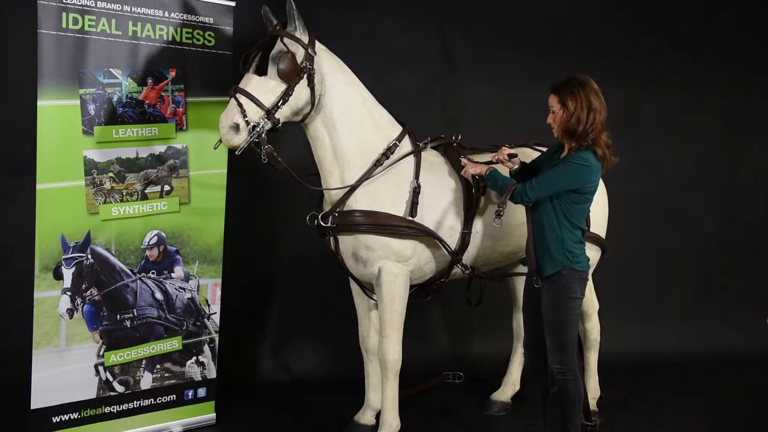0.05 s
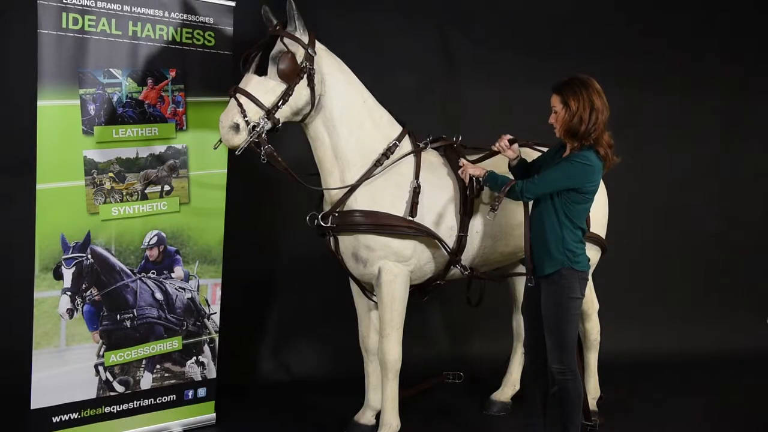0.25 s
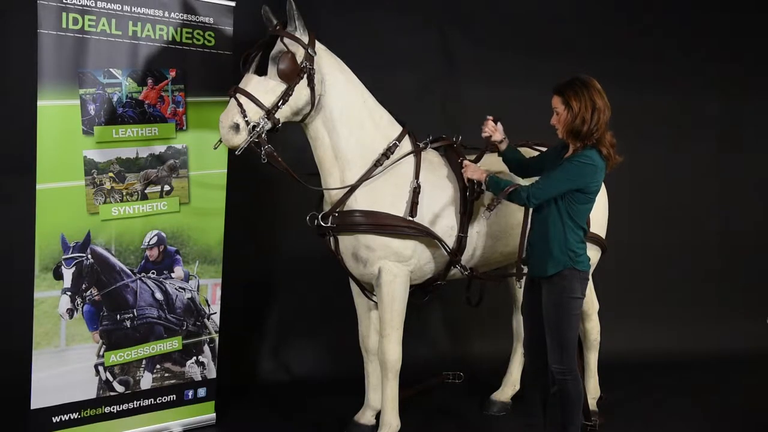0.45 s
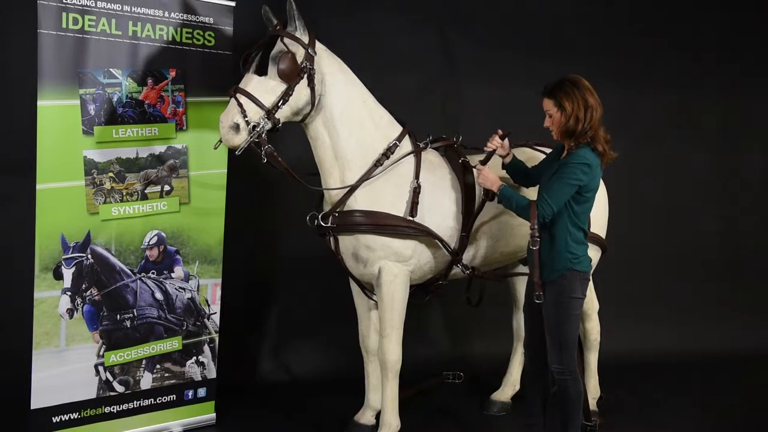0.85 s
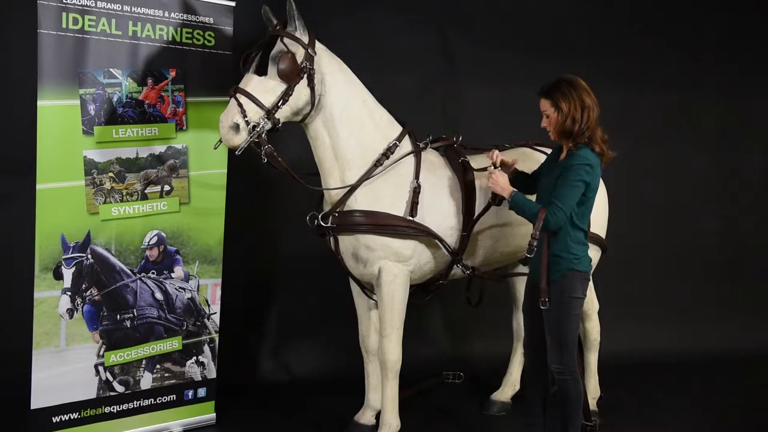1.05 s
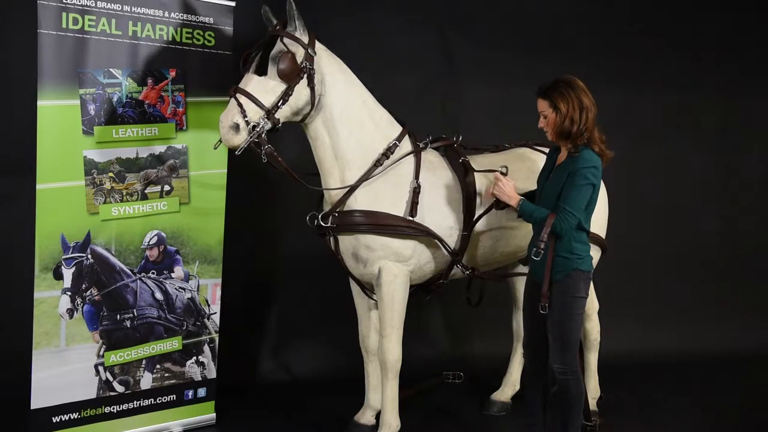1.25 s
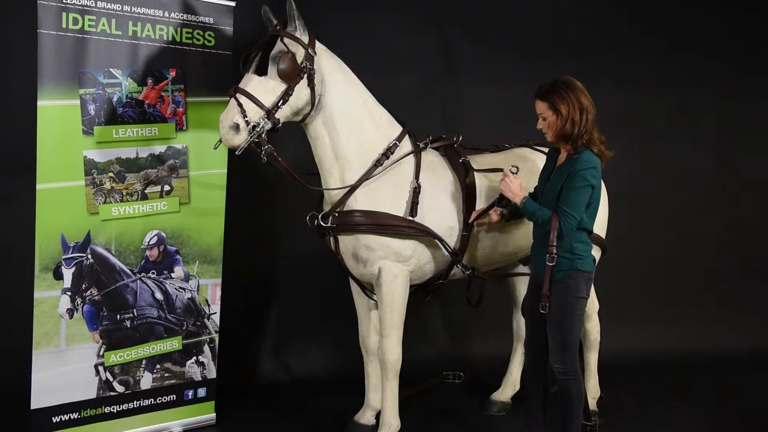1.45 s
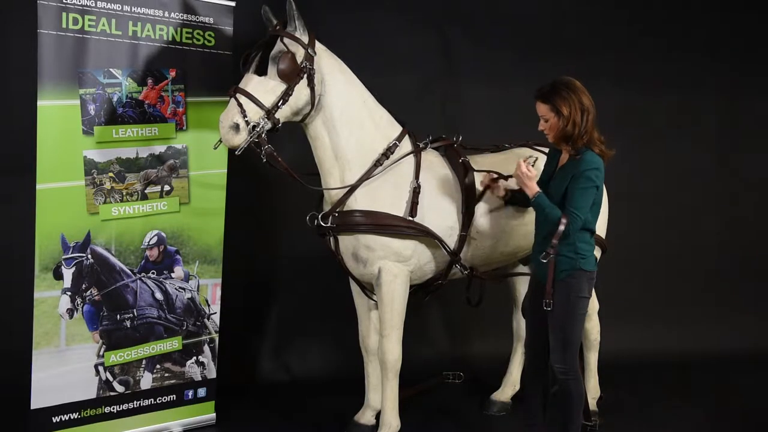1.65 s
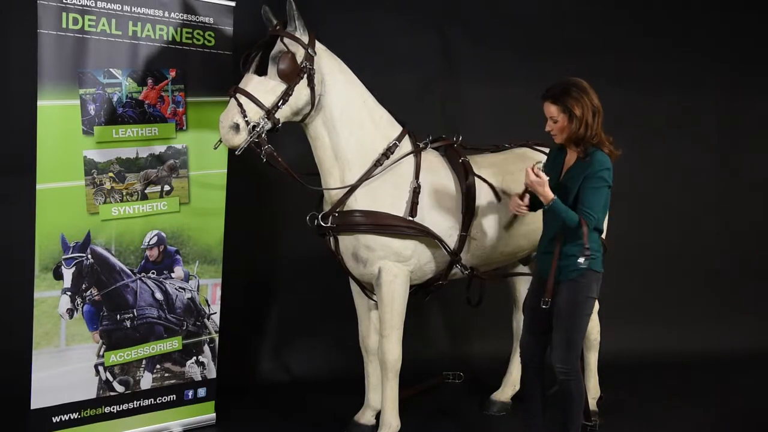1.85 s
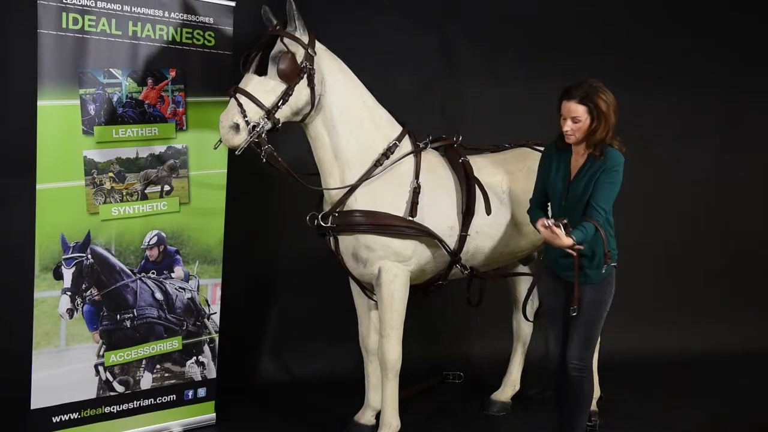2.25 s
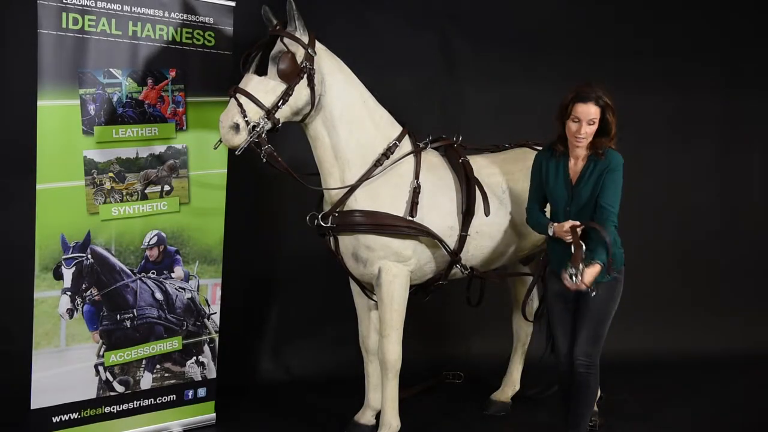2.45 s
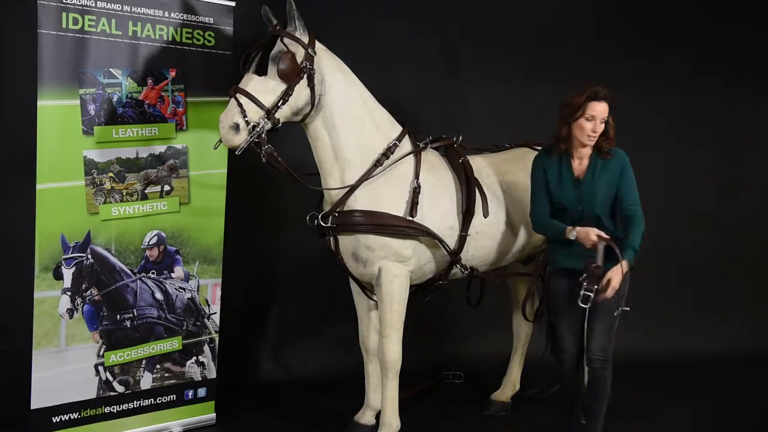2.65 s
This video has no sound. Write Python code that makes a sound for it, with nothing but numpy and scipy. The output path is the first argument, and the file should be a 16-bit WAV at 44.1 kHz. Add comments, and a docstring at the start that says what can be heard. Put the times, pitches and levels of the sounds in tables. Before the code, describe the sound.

Metal buckles clink as leather harness straps are unfastened, sliding and slapping softly.

```python
"""A heavy buckle drops against a hollow model horse as its leather harness is unfastened.
A smaller buckle and a ring clink in the hand; each metal contact cracks, then rings in its modes.
Straps slap the body, which resonates under them, and slide in tiny stick-slip grains.
A small studio rings briefly after every contact; under it lie a soft hiss and a thin electrical whine."""
import sys
import numpy as np
from scipy import signal
from scipy.fft import rfft, irfft
from scipy.io import wavfile
from scipy.ndimage import uniform_filter1d

SR = 44100
rng = np.random.default_rng(int(sys.argv[2]) if len(sys.argv) > 2 else 0)


def unload_wav(signal):
    """Save mono or channel-first audio to the path in sys.argv[1] as 16-bit WAV at rate SR, clipped to [-1, 1]."""
    wavfile.write(
        sys.argv[1],
        SR,
        np.round(np.clip(np.atleast_2d(signal).T, -1, 1) * 32767).astype(np.int16),
    )


N = 119070
TAIL = 32768   # samples for one contact and its decay
TIME, TAIL_S = np.arange(N) / SR, np.arange(TAIL) / SR
HZ = np.maximum(np.fft.rfftfreq(N, 1 / SR), 1)
TAIL_HZ = np.maximum(np.fft.rfftfreq(TAIL, 1 / SR), 1)


def heavy_buckle():
    """The heavy buckle lands on the body in one quick clatter."""
    # contacts: start_s, ring_db, crack_db, tilt_db_per_octave, pan_db, strike_spot
    hits = [(.2065, -40, -42.5, -4, -2.5, 0.9), (.229, -31.5, -28.5, -5, -2.5, 1),
            (.2325, -26, -43, -2, -3, 1), (.2478, -26, -22.5, 0, 0, 0), (.253, -35.5, -25.5, -0.5, 2, 0),
            (.265, -36, -55, -4, 1, 0.45), (.324, -55, -53, -4, 5, .5)]
    # buckle modes: pitch_hz, level_db, free_t60_s, boost_db_at_spot_1
    modes = [(3140, -8, .12, 0), (3268, -10, .26, -2), (4640, -13, .17, -2), (4740, -13, .08, 0),
             (5636, -17, .22, 0), (6795, -6, .18, 0), (7250, -8, .08, 2), (7610, -7, .1, 5),
             (7745, -3, .22, 7), (7850, -7, .12, 5), (8935, -7, .14, -3), (9400, -5, .15, -6),
             (9634, 0, .17, -9), (9825, -5, .18, -6), (11470, -12, .1, -4), (13030, -14, .1, -4)]
    return struck_metal(hits, modes, low_cut_hz=540)


def small_buckle():
    """The smaller buckle clinks in the hand, with less bass in its crack."""
    # contacts: start_s, ring_db, crack_db, tilt_db_per_octave, pan_db, strike_spot
    hits = [(.503, -55.5, -50.5, -3.5, -1, 0.53), (.729, -68, -55, -6, -4, -0.28),
            (1.912, -59, -61, 0, 1, 0.37), (1.997, -47.5, -52, -17, -1.5, 0),
            (2.0085, -39, -44.5, 3, -3.5, 0.079), (2.04, -43, -49, -0.5, -1, 0.73),
            (2.056, -37.5, -44, -0.5, 0, 1), (2.095, -54.5, -52, -3.5, -6, 0.39),
            (2.376, -43, -45.5, -4, -6.5, 0.34), (2.384, -46, -49.5, 3, 3, -0.0026),
            (2.396, -37.5, -44, -5, 0.5, -1.5), (2.400, -41, -40.5, -3.5, 3, -1.2),
            (2.412, -51.5, -40, -3.5, 1, -1.1), (2.636, -52, -53.5, -8, -6, 0.1),
            (2.655, -37.5, -44, 6.5, -0.5, 0.99)]
    # buckle modes: pitch_hz, level_db, free_t60_s, boost_db_at_spot_1
    modes = [(3270, -10, .3, -3), (4645, -13, .3, 5), (5655, -12, .27, 11), (6790, -9, .25, -6),
             (6865, -6, .38, -7), (7125, -9, .2, -1), (7712, -3, .25, -6), (7790, 0, .3, -3),
             (9500, -3, .18, -1), (11520, -16, .2, -5), (11970, -10, .23, 12), (12900, -15, .25, 3),
             (14060, -22, .15, 0), (14750, -21, .12, -3)]
    return struck_metal(hits, modes, low_cut_hz=990)


def harness_ring():
    """The ring, smallest of the fittings, chinks with the thinnest crack."""
    # contacts: start_s, ring_db, crack_db, tilt_db_per_octave, pan_db, strike_spot
    hits = [(1.3635, -37, -72, 0.01, -0.39, 1), (1.3665, -32, -39, 0.0038, -0.4, 0.15),
            (1.373, -42, -49, 0, -0.026, 1), (1.383, -32.5, -42, 0.016, 0.17, 0),
            (2.294, -43, -52.5, 0, 2, 0.54)]
    # ring modes: pitch_hz, level_db, free_t60_s, boost_db_at_spot_1
    modes = [(3530, -21, .07, 2), (5114, -17, .12, 0), (6810, -18, .15, 0), (7757, -12, .15, 0),
             (8080, -4, .14, 2), (8185, -2, .3, 0), (8248, 0, .25, 0), (8540, -13, .18, 0),
             (9715, -16, .1, 2), (10860, -11, .2, 3), (10960, -11, .12, 3)]
    return struck_metal(hits, modes, low_cut_hz=6000)


def struck_metal(hits, modes, low_cut_hz, crack_s=0.0022, scatter_db=1.5):
    """Each contact cracks and sets the modes ringing; the spot struck shifts their balance."""
    # spectrum of metal cracking on metal: frequency_hz, level_db
    crack_eq = [(300, -29), (1500, -12.5), (2500, -13.5), (3400, -3.5), (4200, -6.5), (5500, -5.5),
                (7200, 2.5), (9500, 3), (11000, -3.5), (13000, -3.5), (14700, -21), (16000, -25)]
    crack_filter = causal(colour(crack_eq, TAIL_HZ) / np.hypot(1, (low_cut_hz / TAIL_HZ) ** 3))
    out, tones = np.zeros((2, N)), damped_tones(modes)
    hz, mode_db, _, spot_db = np.transpose(modes)
    for start_s, ring_db, crack_db, tilt_db, pan_db, spot in hits:
        path = room()
        scatter = scatter_db * rng.standard_normal(len(hz))
        gains = from_db(mode_db + spot * spot_db + tilt_db * np.log2(hz) + scatter)
        ringing = unit(sum(gain * unit(tone * path) for gain, tone in zip(gains, tones)))
        tilt = from_db(tilt_db * np.log2(np.maximum(TAIL_HZ, hz.min())))
        crack = unit(burst(crack_s) * crack_filter * tilt * path)
        pan = from_db([[pan_db / 2], [-pan_db / 2]])   # positive leans left
        add(out, start_s, (from_db(ring_db) * ringing + from_db(crack_db) * crack) * pan)
    return out


def strap_slaps(body_db=-7, treble_floor_db=-24):
    """Soft blows of leather, with the hollow body sounding under them."""
    # blows: start_s, level_db, decay_s, low_cut_hz, high_cut_hz
    slaps = [(.187, -50, 0.0047, 500, 3600), (0.199, -45.5, 0.011, 80, 2500),
             (.2235, -31.5, 0.0027, 106, 2270), (0.242, -35.5, 0.0048, 71.4, 470),
             (0.255, -40, .004, 67, 310), (.755, -51, 0.037, 89, 352), (0.733, -56, 0.0032, 151, 2300),
             (.908, -59, 0.0027, 246, 590), (1.425, -50, 0.017, 121, 1060),
             (1.534, -34.5, 0.0071, 132, 1420), (1.543, -33, 0.023, 140, 1800),
             (1.655, -48, 0.025, 89.5, 1540), (1.74, -57, 0.0058, 78, 1570),
             (1.995, -55, 0.0064, 157, 1210), (2.53, -53.5, 0.0069, 172, 860),
             (2.589, -52, 0.00087, 173, 464), (2.609, -74, 0.005, 168, 450)]
    # spectrum of a leather slap: frequency_hz, level_db
    slap_eq = [(60, 2.5), (160, -2), (300, -1.5), (550, -5.5), (850, -6.5), (1300, -13.5), (2000, -9),
               (4000, -10.5), (12000, -28)]
    # hollow body modes: pitch_hz, level_db, free_t60_s
    modes = [(119.9, 1.5, 0.16), (159.2, -9.5, 0.15), (226, -5.5, 0.15), (275.3, -1, 0.12), (339, -10, 0.1),
             (464, -11.5, 0.067), (779, -15.5, 0.072), (1071, 2, 0.16), (1384, 8.5, 0.09)]
    out, tones = np.zeros((2, N)), damped_tones(modes)
    gains = from_db([db for _, db, _ in modes])
    for start_s, level_db, decay_s, low_cut_hz, high_cut_hz in slaps:
        path = room()
        high_cut = 1 / np.hypot(1, (TAIL_HZ / high_cut_hz) ** 4) + from_db(treble_floor_db)
        band = causal(high_cut / np.hypot(1, (low_cut_hz / TAIL_HZ) ** 4))
        smack = unit(burst(decay_s) * causal(colour(slap_eq, TAIL_HZ)) * path * band)
        body = sum(gain * rng.choice([-1, 1]) * unit(tone * path) for gain, tone in zip(gains, tones))
        add(out, start_s, from_db(level_db) * (smack + from_db(body_db) * unit(band * body)))
    return out


def strap_slides(grains_per_s=1500, grain_spread_db=2.5):
    """Leather sticks and slips in tiny grains under a stroke that swells and fades."""
    # strokes: peak_s, half_length_s, level_db, tilt_db_per_octave
    strokes = [(.05, 0.19, -57, 1), (0.487, 0.028, -57.5, 0.5), (0.568, 0.042, -54.5, 1.5),
               (0.687, 0.023, -52.5, 1), (.76, .045, -49.5, 0), (0.852, 0.083, -57, -1),
               (1.022, 0.047, -51.5, 2.5), (1.087, 0.037, -58.5, -1), (1.179, 0.049, -48.5, 1),
               (1.265, 0.06, -73, -3), (1.564, 0.029, -44, 5.5), (1.678, .04, -52.5, 4),
               (2.019, 0.046, -50.5, 4), (2.219, 0.028, -54, 7), (2.299, 0.016, -54.5, 1.5),
               (2.341, 0.04, -48, 3.5), (2.418, 0.043, -53.5, 3), (2.59, 0.036, -47.5, 4),
               (2.662, 0.058, -47.5, 9)]
    # spectrum of rubbing leather: frequency_hz, level_db
    leather_eq = [(60, -7.5), (130, 1), (300, 1.5), (700, -3), (1800, -6), (3500, -14), (8000, -18),
                  (12000, -22.5), (16000, -55)]
    out = np.zeros((2, N))
    for peak_s, half_s, level_db, tilt_db in strokes:
        slips = (rng.random(TAIL) < grains_per_s / SR) * rng.choice([-1, 1], TAIL)
        grains = slips * from_db(grain_spread_db * np.minimum(rng.exponential(1, TAIL), 4))
        swell = np.sin(np.pi / 2 * np.minimum(TAIL_S / half_s, 2))
        timbre = causal(colour(leather_eq, TAIL_HZ) * from_db(tilt_db * np.log2(TAIL_HZ / 1000)))
        add(out, peak_s - half_s, from_db(level_db) * unit(rfft(grains * swell) * timbre * room()))
    return out


def room(low_t60_s=0.4, high_t60_s=0.25, crossover_hz=9000, build_up_s=0.0004, direct_db=-7):
    """Spectrum of the direct sound and dense echoes from one spot; the treble dies sooner."""
    noise = rng.standard_normal((2, TAIL)) * (1 - np.exp(-TAIL_S / build_up_s))
    lowpass = 1 / (1 + 1j * TAIL_HZ / crossover_hz)
    lows = lowpass * rfft(noise * from_db(-60 * TAIL_S / low_t60_s))
    highs = (1 - lowpass) * rfft(noise * from_db(-60 * TAIL_S / high_t60_s))
    direct = from_db(direct_db) * unit(np.ones(1))
    return direct + unit(spread(*(lows + highs), TAIL_HZ))


def room_hiss(level_db=-58.5):
    """A soft, steady bed of diffuse noise."""
    # spectrum of the room tone: frequency_hz, level_db
    hiss_eq = [(25, -15), (55, -6), (110, -3), (250, -5.5), (500, -12.5), (1000, -13.5), (2500, -15.5),
               (5500, -17.5), (8500, -14), (10400, -21.5), (13000, -25), (16000, -38)]
    mid, side = rfft(rng.standard_normal((2, N)))
    hiss = irfft(spread(mid, side, HZ) * colour(hiss_eq, HZ), N)
    return from_db(level_db) * hiss / hiss.std()


def electrical_whine(pitch_hz=10588.5, first_pulse_s=0.085, period_s=0.1, right_db=-21.5):
    """On the left, a steady whine, a buzz that switches on and off, and a faint fizz."""
    whine = from_db(-61.5) * np.sqrt(2) * np.sin(2 * np.pi * pitch_hz * TIME)
    switched_on = np.cos(2 * np.pi * (TIME - first_pulse_s) / period_s) > 0
    gate = uniform_filter1d(switched_on.astype(float), size=200)
    buzz = from_db(-55.5) * gate * narrow_noise(hz=10110, width_hz=55)
    fizz = from_db(-61.5) * narrow_noise(hz=9670, width_hz=620)
    return (whine + buzz + fizz) * from_db([[0], [right_db]])


def damped_tones(modes, grip_db_per_s=68):
    """The spectrum of one dying sine per mode; hand and leather shorten its free decay."""
    grip = from_db(-grip_db_per_s * TAIL_S)
    return [rfft(np.sin(2 * np.pi * hz * TAIL_S) * from_db(-60 * TAIL_S / free_t60_s) * grip)
            for hz, _, free_t60_s, *_ in modes]


def burst(decay_s):
    """Spectrum of a rough contact: a sudden, quickly dying force."""
    return rfft(rng.standard_normal(TAIL) * np.exp(-TAIL_S / decay_s))


def narrow_noise(hz, width_hz):
    """Noise around one frequency, rms 1."""
    noise = irfft(rfft(rng.standard_normal(N)) / (1 + ((HZ - hz) / width_hz) ** 2), N)
    return noise / noise.std()


def spread(mid, side, hz):
    """Diffuse sound: alike in both ears in the bass, wide in the treble."""
    # stereo width: frequency_hz, side_minus_mid_db
    width_curve = [(150, -73), (280, -47), (370, -21.5), (550, -16.5), (850, -9.5), (1400, -1), (2500, 0.5),
                   (8000, 0.5)]
    width = colour(width_curve, hz)
    return (mid + side * width * [[1], [-1]]) / np.sqrt(1 + width ** 2)


def from_db(db):
    """Decibels to gain."""
    return 10 ** (np.asarray(db) / 20)


def colour(curve, hz):
    """Gain of an EQ curve at these frequencies."""
    curve_hz, curve_db = np.transpose(curve)
    return from_db(np.interp(np.log(hz), np.log(curve_hz), curve_db))


def causal(gain):
    """The minimum-phase filter with this gain: nothing sounds ahead of the attack."""
    cepstrum = irfft(np.log(gain + 1e-7))
    fold = np.r_[1, np.full(TAIL // 2 - 1, 2), 1, np.zeros(TAIL // 2 - 1)]
    return np.exp(rfft(cepstrum * fold))


def unit(spectrum):
    """Scale a spectrum to the energy of a twentieth of a second at rms 1."""
    return spectrum * np.sqrt(SR / 20 / (np.mean(np.abs(spectrum) ** 2) + 1e-20))


def add(out, start_s, spectrum):
    """Mix one sound in at start_s, no earlier than zero; its far end fades out."""
    start = max(int(start_s * SR), 0)
    fade = np.clip(10 * (1 - TAIL_S / TAIL_S[-1]) - 1, 0, 1)
    out[:, start:start + TAIL] += (irfft(spectrum) * fade)[:, :max(N - start, 0)]


def scene():
    """Metal, leather and the quiet room."""
    metal = heavy_buckle() + small_buckle() + harness_ring()
    return metal + strap_slaps() + strap_slides() + room_hiss() + electrical_whine()


def record(dry):
    """A steep high cut takes off the very top."""
    cutoff_hz = 15900
    return signal.sosfilt(signal.ellip(10, .1, 90, cutoff_hz, fs=SR, output="sos"), dry)


dry = scene()
out = record(dry)
unload_wav(out)
```